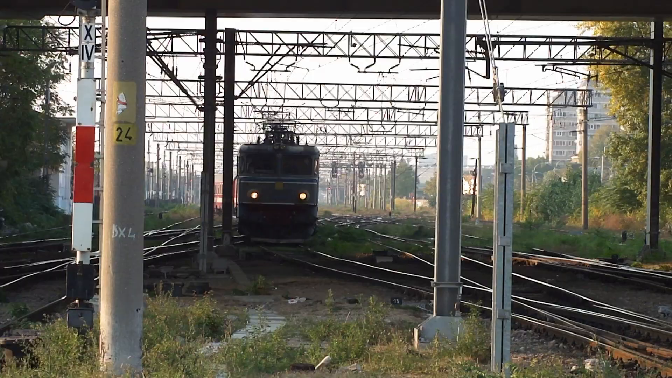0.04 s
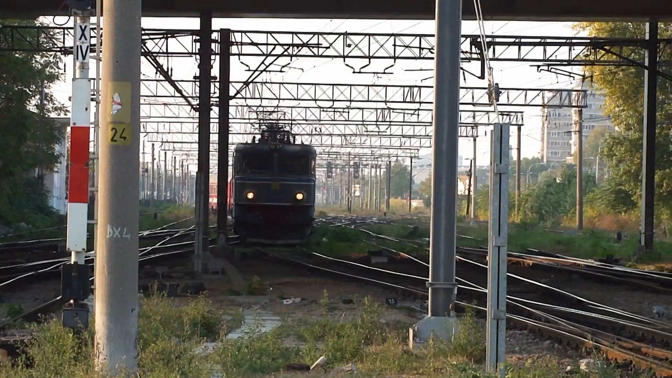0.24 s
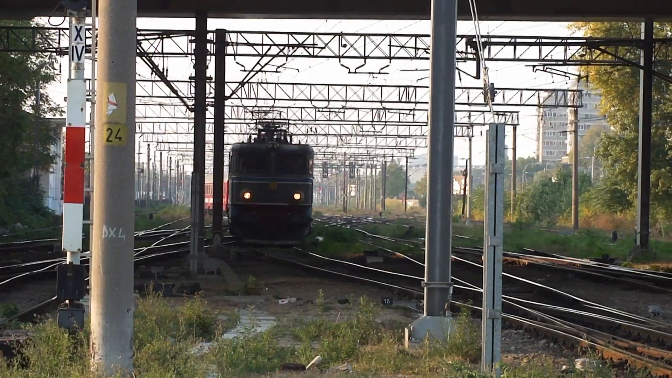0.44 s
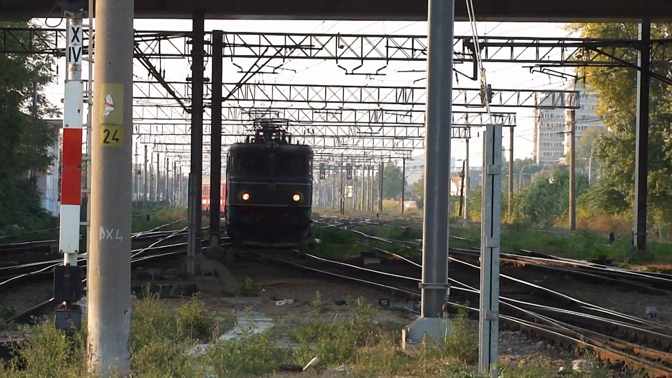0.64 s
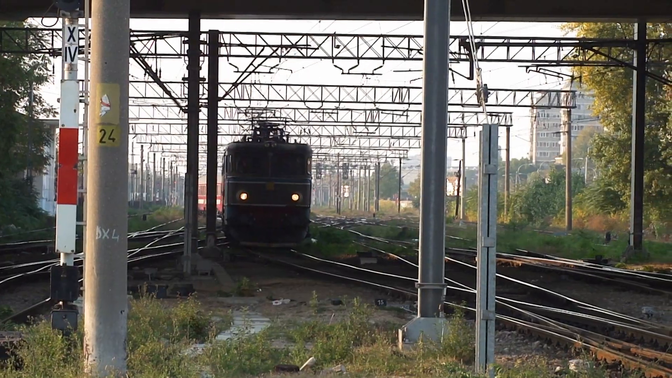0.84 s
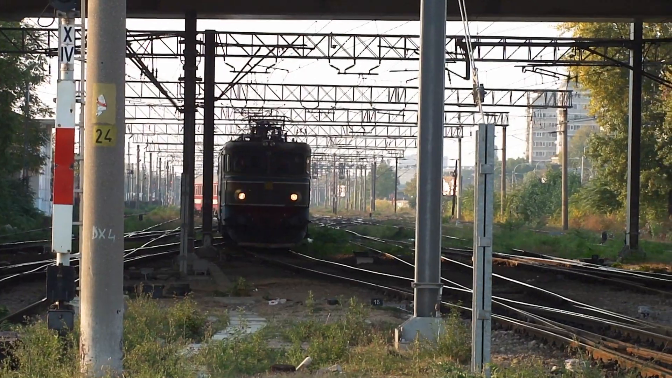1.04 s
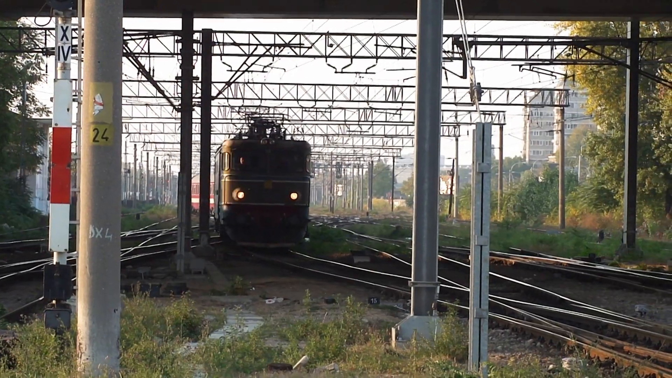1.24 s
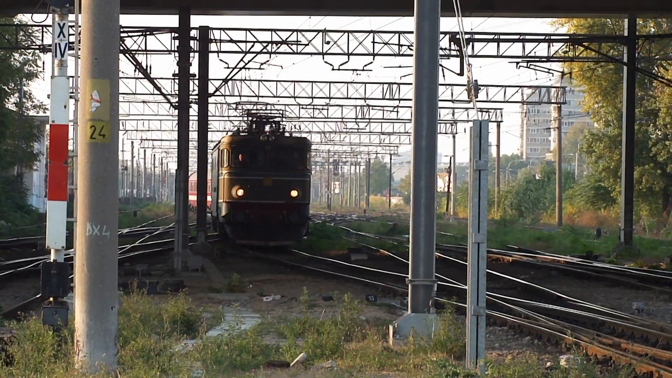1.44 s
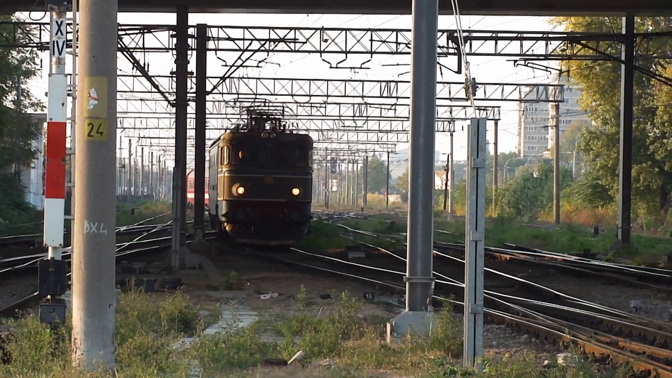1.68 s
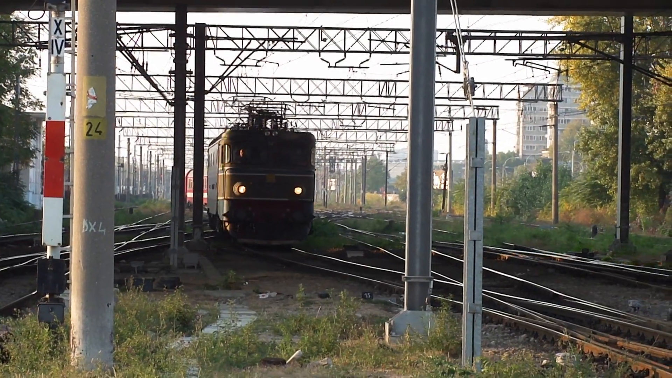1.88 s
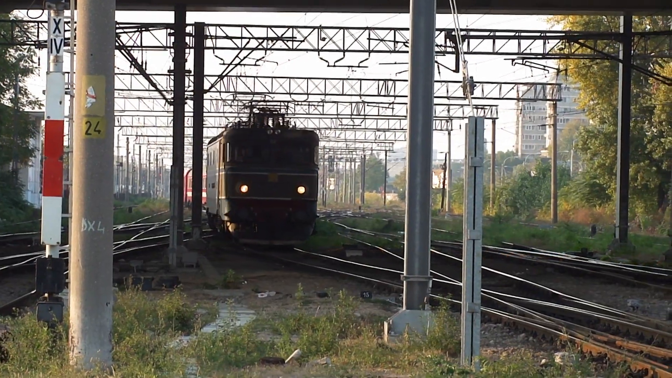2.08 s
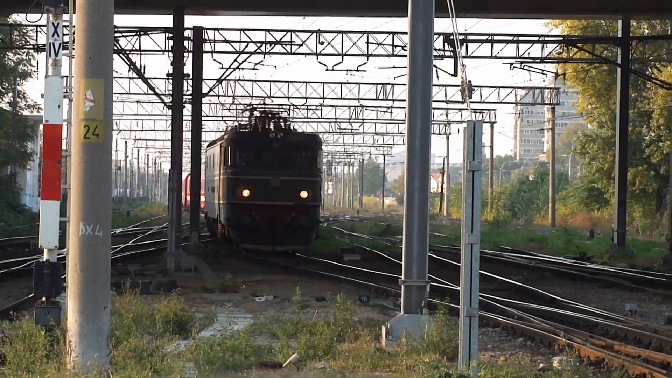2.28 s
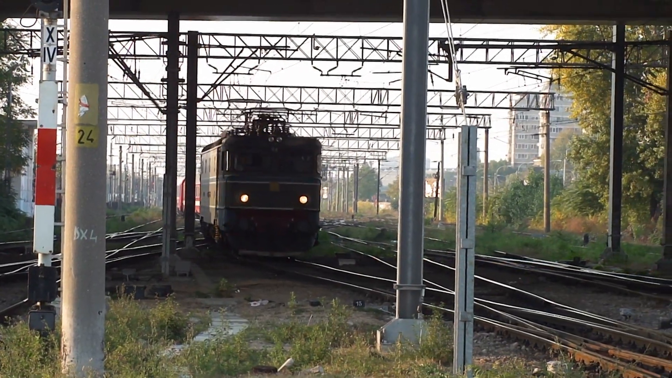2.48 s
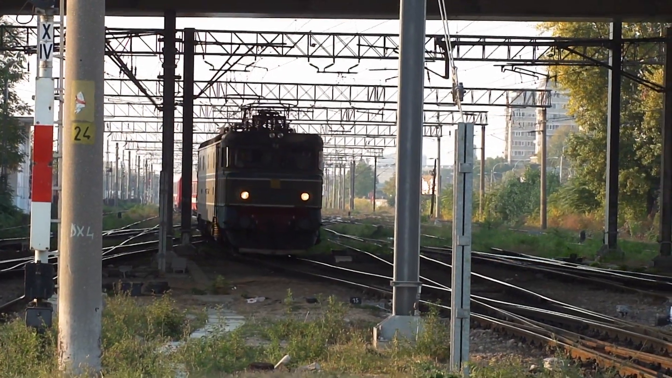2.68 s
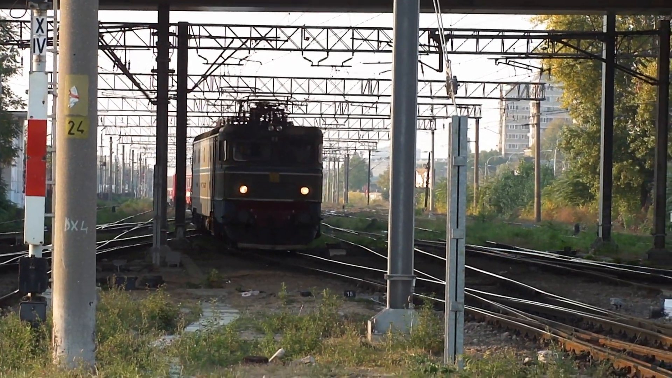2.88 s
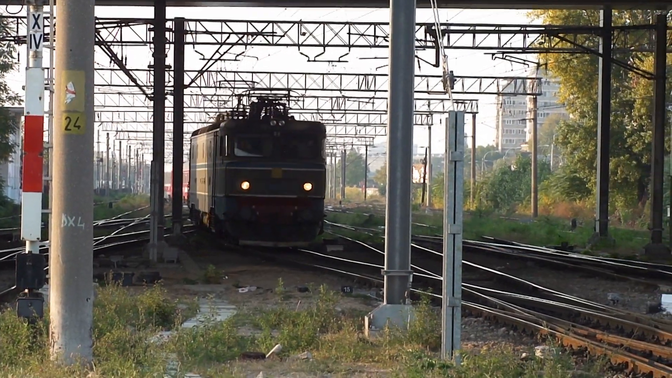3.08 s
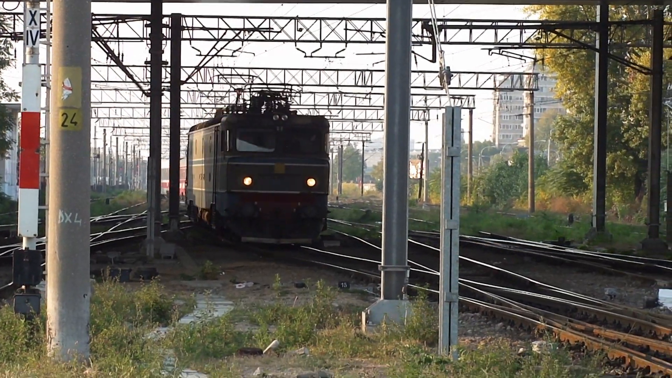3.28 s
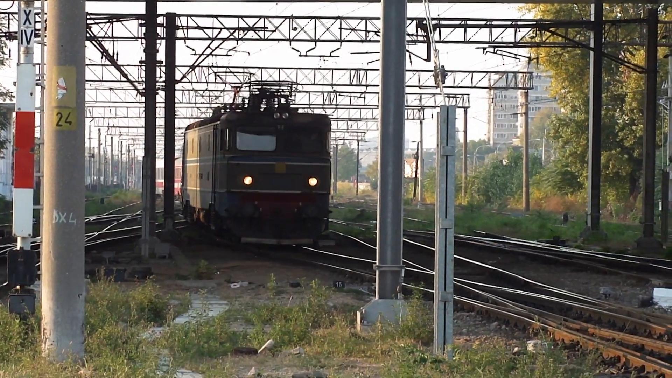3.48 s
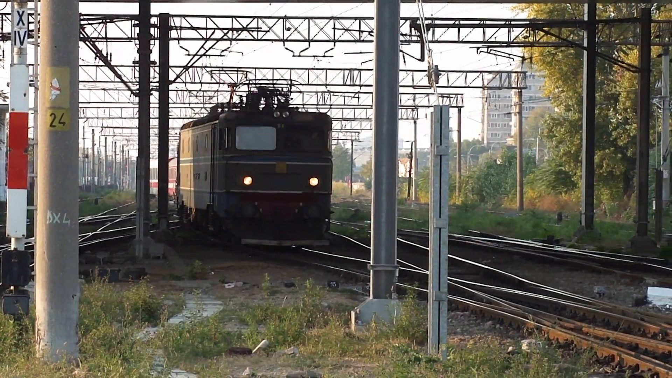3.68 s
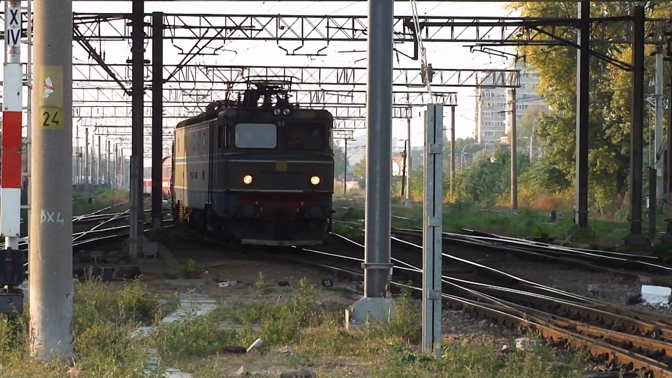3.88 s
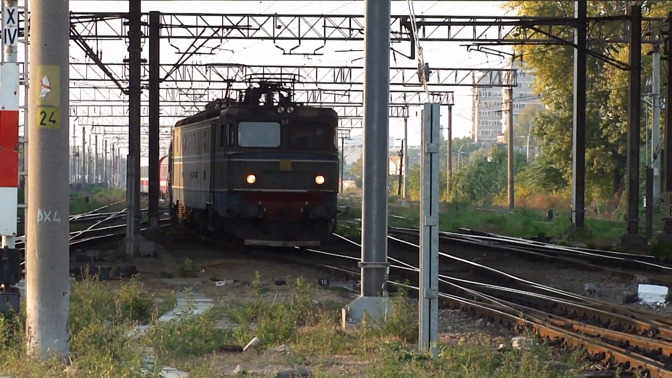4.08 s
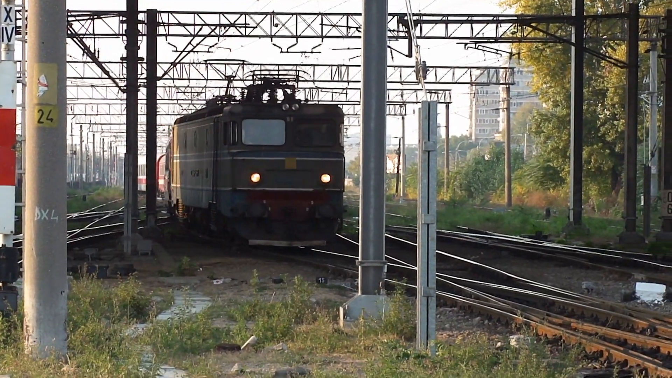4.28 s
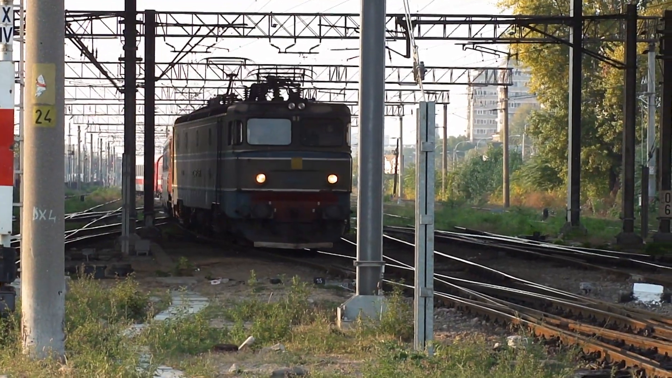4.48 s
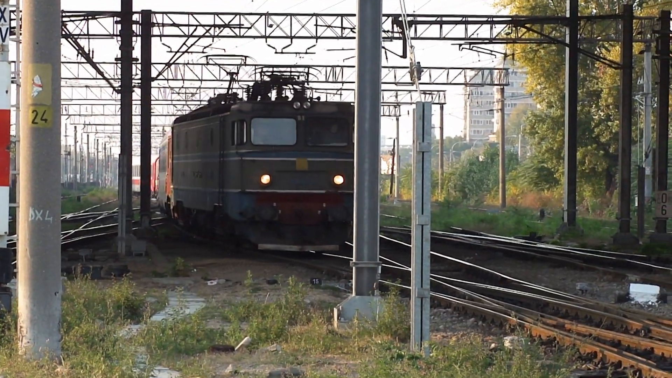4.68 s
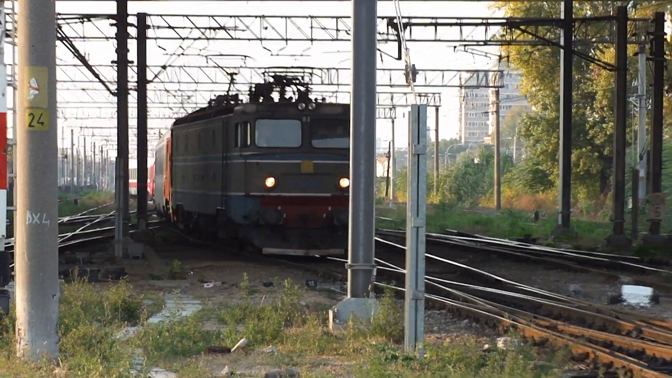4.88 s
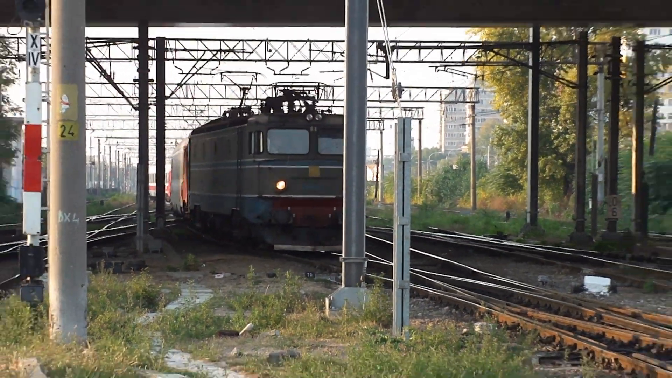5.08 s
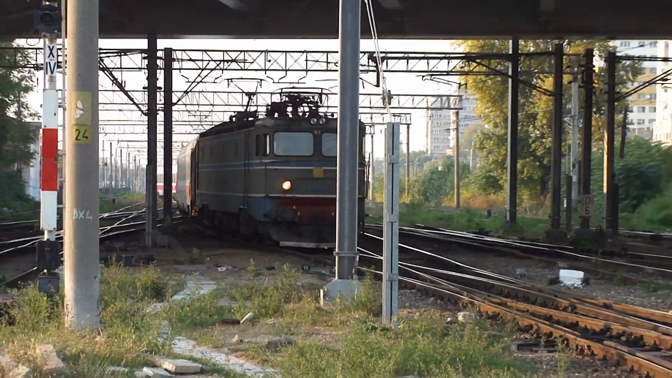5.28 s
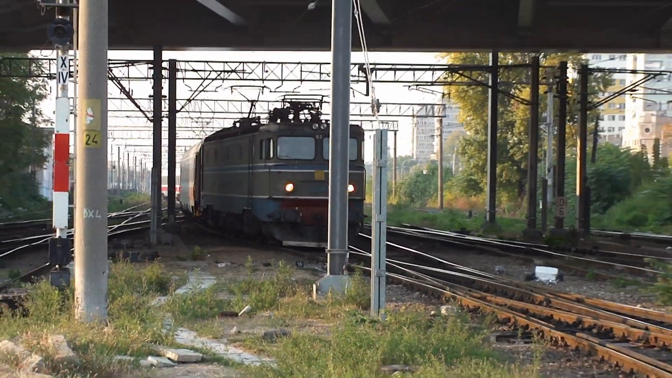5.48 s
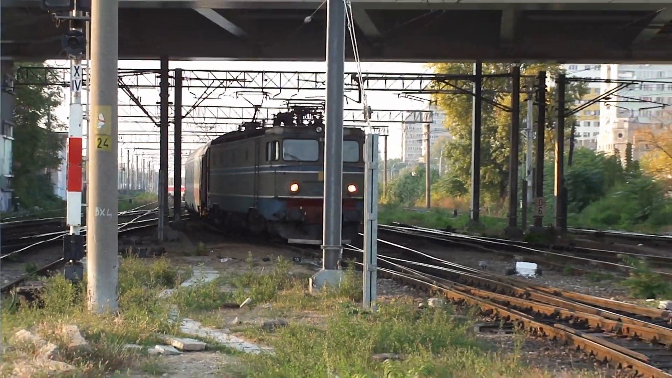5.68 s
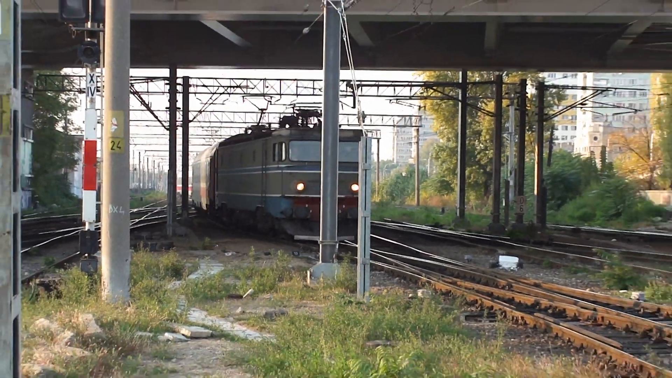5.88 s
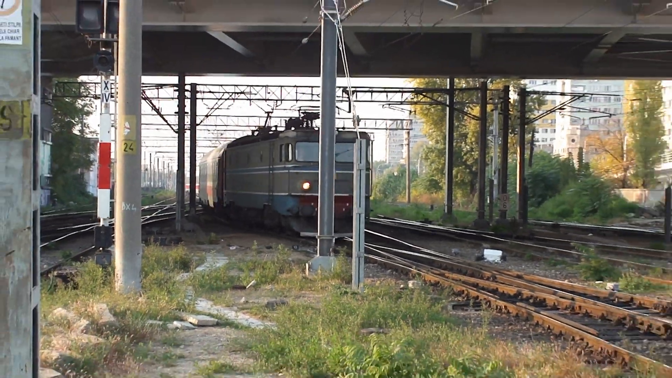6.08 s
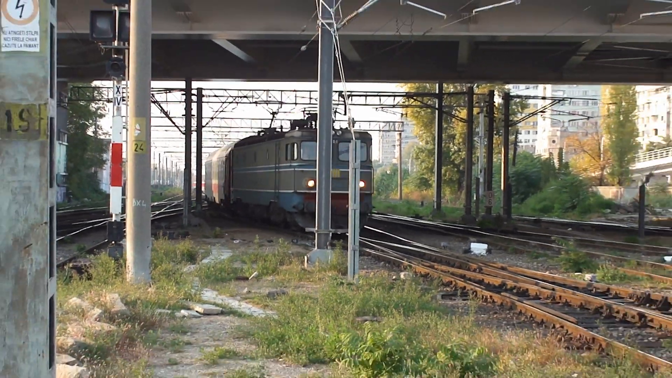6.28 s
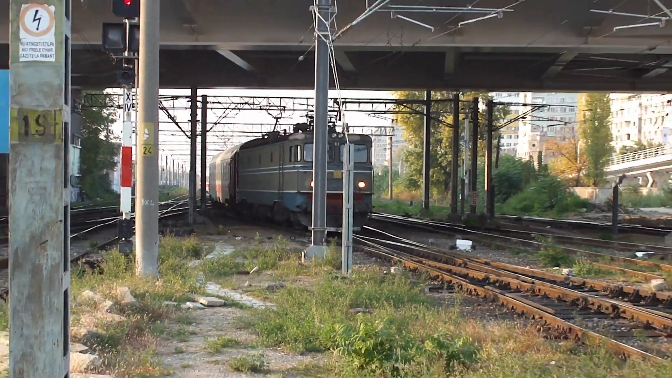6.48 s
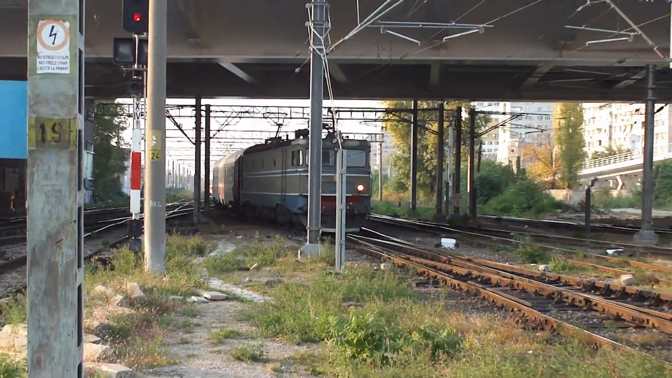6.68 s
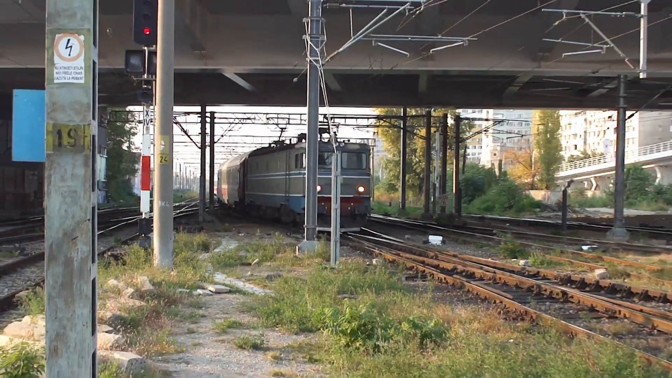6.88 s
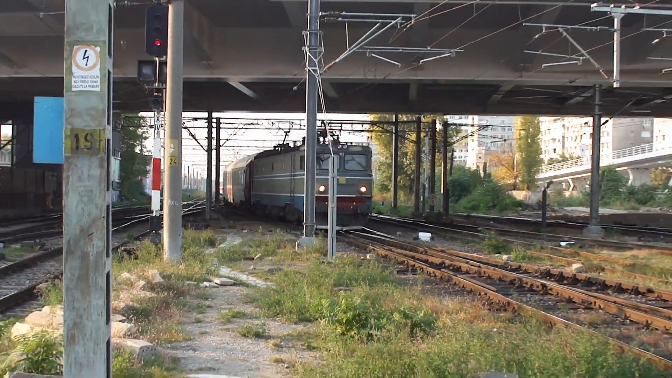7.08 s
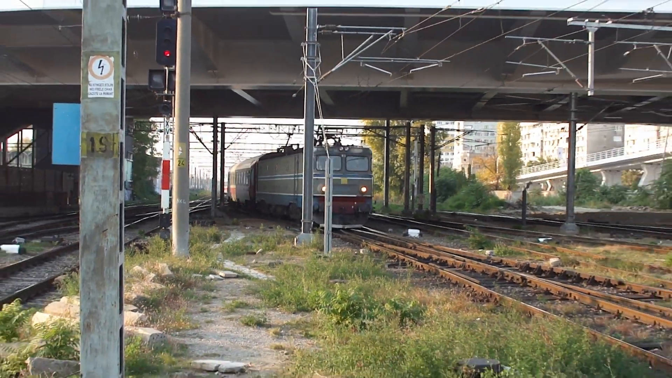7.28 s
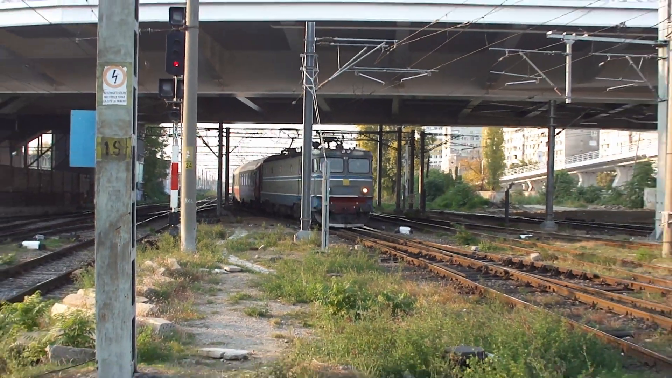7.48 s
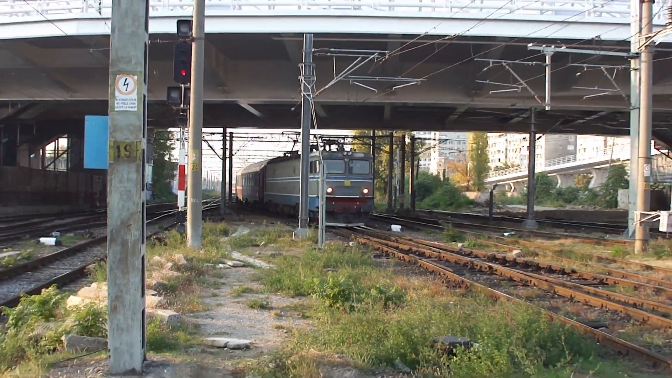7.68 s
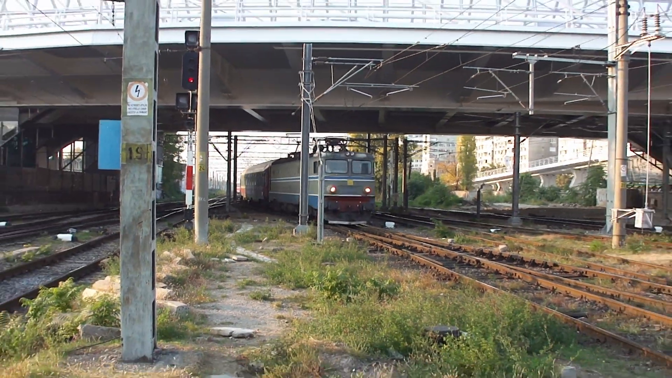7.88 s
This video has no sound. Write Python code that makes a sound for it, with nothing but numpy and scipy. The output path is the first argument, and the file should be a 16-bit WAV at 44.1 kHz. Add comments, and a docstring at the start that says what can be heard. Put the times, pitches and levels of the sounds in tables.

```python
"""A growing roar of wheels on rails: an electric locomotive hauls its coaches closer over pointwork.
Rough treads shake rails, wheels and bogies; the drive whines; the town rumbles low.
Wheels knock over joints and a flange sings thinly, both echoed by a road bridge's deck.
Faint high whistles glide; later the treads scrub through a curve.
The camcorder adds its own faint whistle and ticks, and notches the treble."""
import sys
import numpy as np
from scipy import signal
from scipy.fft import rfft, irfft, next_fast_len
from scipy.io import wavfile
from scipy.ndimage import uniform_filter1d, map_coordinates

SR = 44100
rng = np.random.default_rng(int(sys.argv[2]) if len(sys.argv) > 2 else 0)


def generate_wav(signal):
    """Clip the signal to [-1, 1] and save it as 16-bit WAV at the path in sys.argv[1]."""
    frames = np.transpose(np.atleast_2d(signal))
    scaled = np.clip(frames, -1, 1) * 32767
    pcm = np.round(scaled).astype(np.int16)
    wavfile.write(sys.argv[1], SR, pcm)


N = 349933
TIME = np.arange(N) / SR

# wheel-rail contact hiss spectrum: f/Hz, level/dB
HISS_SPECTRUM = [(2200, -39), (3400, -0.5), (4500, -6.5), (5600, 3.5), (6500, 3), (7500, -2), (9000, -8.5),
                 (11000, -35)]
# top-octave sizzle spectrum: f/Hz, level/dB
SIZZLE_SPECTRUM = [(5500, -20), (7500, 4.5), (8700, 3), (10000, -0.5), (10800, -6.5), (11200, -19)]


def amp(db):
    """Decibels to gain."""
    return 10 ** (np.asarray(db) / 20)


def unit(x):
    """x at rms 1."""
    return x / np.sqrt(np.mean(x ** 2) + 1e-20)


def along(points, hz):
    """Interpolate (f/Hz, value) points on a log axis."""
    f, v = np.transpose(points)
    return np.interp(np.log(hz + 1), np.log(f + 1), v)


def wobble(rate_hz):
    """Smooth random curve, rate_hz knots a second."""
    return map_coordinates(rng.standard_normal(int(N * rate_hz / SR) + 4), [TIME * rate_hz])


def step(start_s, rise_s):
    """Ramp from 0 to 1, then hold."""
    return np.clip((TIME - start_s) / rise_s, 0, 1)


def swell(start_s, length_s):
    """Rounded envelope, peak 1."""
    return np.sqrt(np.abs(np.sin(np.pi * step(start_s, length_s))))


def swells(rows):
    """Summed gain of swells: t/s, length/s, level/dB."""
    return sum(amp(db) * swell(t, length) for t, length, db in rows)


def blow(start_s, attack_s, t60_s):
    """Impact envelope: fast rise, exponential decay."""
    age_s = np.maximum(TIME - start_s, 0)
    return (1 - np.exp(-age_s / attack_s)) * amp(-60 * np.minimum(age_s / t60_s, 2))


def approach(db, power, start_m=87.5, speed_m_per_s=5.1):
    """Gain of db at start_m, growing as 1 / distance ** power."""
    distance_m = np.maximum(start_m - speed_m_per_s * TIME, 1)
    return amp(db) * (start_m / distance_m) ** power


def filtered(x, response):
    """Apply a frequency response to x."""
    size = next_fast_len(N + SR // 4)
    return irfft(rfft(x, size) * response(np.fft.rfftfreq(size, 1 / SR)), size)[..., :N]


def spread(pair, response):
    """Two independent noises to coloured stereo of rms 1, alike in the bass."""
    # left-right likeness: f/Hz, correlation
    likeness = [(30, .85), (60, .95), (130, .98), (270, .988), (560, .985), (1180, .96), (2490, .9),
                (3600, .65), (5240, .32), (7000, .15), (11000, .05)]

    def mid_side(hz):
        angle = np.arccos(np.clip(along(likeness, hz), -1, 1)) / 2
        return response(hz) * np.array([np.cos(angle), np.sin(angle)])

    mid, side = filtered(pair, mid_side)
    return unit(np.array([mid + side, mid - side]))


def colour(spectrum):
    """Response of a spectrum, with steep skirts beyond its ends."""
    low_hz, high_hz = spectrum[0][0], spectrum[-1][0]
    skirts = lambda hz: np.minimum(hz / low_hz, 1) ** 2 / np.maximum(hz / high_hz, 1) ** 6
    return lambda hz: amp(along(spectrum, hz)) * skirts(hz)


def rush(spectrum, patchy_db):
    """Stereo noise of rms 1 with time-frequency patches of random gain."""
    bins = signal.stft(rng.standard_normal((2, N)), nperseg=512)[2]
    patches = uniform_filter1d(rng.standard_normal(bins.shape[1:]), size=5, axis=0)
    patches = unit(uniform_filter1d(patches, size=14, axis=1))
    pair = signal.istft(bins * amp(patchy_db * patches), nperseg=512)[1][:, :N]
    return spread(pair, colour(spectrum))


def fuzzy_tone(hz, width_hz):
    """Narrow noise band of rms 1 around a pitch."""
    phase = 2 * np.pi * np.cumsum(hz * np.ones(N)) / SR
    return unit(wobble(width_hz) * np.cos(phase) + wobble(width_hz) * np.sin(phase))


def rolling():
    """Rough treads shake rails, wheels and car bodies, harder over pointwork; contact patches hiss."""
    # rail, wheel and car-body spectra: f/Hz, level/dB
    rail_spectrum = [(150, -33.5), (300, -10), (440, -2.5), (640, 0.5), (840, -1.5), (900, -10),
                     (1200, -10), (2000, -42)]
    wheel_spectrum = [(600, -36.5), (900, -3), (1100, 1), (1260, -3), (1430, -5.5), (1700, -3), (1900, -4),
                      (2100, -9.5), (2500, -17), (2800, -29), (3500, -38), (5000, -51)]
    body_spectrum = [(20, -42), (45, -29.5), (64, -35), (95, -11.5), (125, -7), (190, 1.5), (270, -1),
                     (360, -2.5), (600, -38.5)]
    # stretches of pointwork: t/s, length/s, extra rumble/dB
    pointwork = [(1.85, 1.34, 1.5), (4.22, 0.2, 2), (4.6, .25, 4.2), (5.152, .25, 1), (6.22, 1, 2)]
    wheel_load = wobble(8.3)
    shake_db = sum(db * swell(t, length) for t, length, db in pointwork)
    curve_db = 0.53 * step(4.15, rise_s=0.27)  # wheels ring louder in the curve
    bright_db = 4.5 * step(4.92, rise_s=0.015)
    rail_db = -32 + 0.15 * shake_db + 0.21 * wheel_load
    rail = approach(rail_db, power=1.81) * rush(rail_spectrum, patchy_db=0.85)
    wheel_db = -32 + curve_db + 0.5 * wheel_load
    wheel = approach(wheel_db, power=1.45) * rush(wheel_spectrum, patchy_db=0.46)
    rumble_db = -41.5 + shake_db + 0.54 * wobble(9)
    rumble = approach(rumble_db, power=1) * rush(body_spectrum, patchy_db=0.03)
    hiss_db = -56.5 + 0.21 * shake_db + 0.23 * bright_db + 0.47 * wheel_load
    hiss = approach(hiss_db, power=1.42) * rush(HISS_SPECTRUM, patchy_db=0.95)
    sizzle_db = -67.5 + bright_db + 0.5 * wobble(28)
    sizzle = approach(sizzle_db, power=1.23) * rush(SIZZLE_SPECTRUM, patchy_db=-2)
    return rail + wheel + rumble + hiss + sizzle


def bogies():
    """Roughness drives low resonances, each swelling by itself; at times one rings out."""
    # bogie and track modes: f/Hz, width/Hz, level/dB
    modes = [(366.7, 40, -6.5), (453.7, 51, -1), (546, 35, -3.5), (646.6, 90, 0.5), (762.4, 68, -2),
             (844.5, 29, -4)]
    # modes ringing out: t/s, length/s, f/Hz, level/dB
    ring_outs = [(1.298, .65, 650, -35.5), (6.1, .6, 627, -29.5), (6.68, 0.52, 750, -34),
                 (6.66, 0.7, 848, -30.5), (7.15, 0.96, 634.4, -31), (7.3, .55, 447, -32.5),
                 (7.35, 0.31, 795, -32)]
    drone = np.zeros((2, N))
    for hz, width, db in modes:
        mode = lambda f: (1j * f * width / (hz * hz - f * f + 1j * f * width)) ** 2
        drone += amp(db + 0.8 * wobble(2.48)) * spread(rng.standard_normal((2, N)), mode)
    points_db = 2 * step(5.9, rise_s=0.5)  # harder on the nearest points
    rings = sum(amp(db) * swell(t, length) * fuzzy_tone(hz, width_hz=19)
                for t, length, hz, db in ring_outs)
    return approach(-36.5 + points_db, power=1.16) * unit(drone) + rings


def drive():
    """The traction drive whines over a gear tone and a deep hum that swells once."""
    turn_db = -8 * step(6, rise_s=0.65)  # the whine dies back as the locomotive turns
    whine_db = -51.5 + turn_db + 1.3 * wobble(1.4)
    whine = approach(whine_db, power=2.3) * fuzzy_tone(hz=1940, width_hz=30)
    gear = approach(-45.5 + 1.5 * wobble(2.1), power=1.2) * fuzzy_tone(hz=844, width_hz=29)
    hum = amp(-62.5 + 5.5 * swell(0.94, length_s=1.7)) * fuzzy_tone(hz=75.4, width_hz=37)
    return whine + gear + hum


def town():
    """Steady low rumble of the town around the tracks."""
    spectrum = [(20, -7.5), (45, -10.5), (80, 0.5), (200, -4), (1000, -15)]  # f/Hz, level/dB
    return amp(-61.5) * rush(spectrum, patchy_db=-0.5)


def camcorder(field_hz=50):
    """The electronics whistle on two close tones; the mechanism ticks once a picture field."""
    tone = lambda hz: np.sqrt(2) * np.sin(2 * np.pi * hz * TIME + 0.5 * wobble(8))
    whistle = amp(-72.5) * (tone(hz=7800) + tone(hz=7825))
    field_phase = TIME * field_hz % 1
    ticks = amp(-64) * unit(np.exp(-field_phase / 0.13) * rush(HISS_SPECTRUM, patchy_db=-3))
    return whistle + ticks


def joints():
    """A wheel drops into a gap: dull thud, sharp crack, longer bright clink."""
    # wheels on joints and frogs: t/s, clink/dB, thud/dB, crack/dB
    hits = [(.583, -56, -37, -54.5), (.94, -54.5, -45, -64), (1.065, -61, -27.5, -67),
            (1.924, -51, -27, -66), (2.108, -53, -39, -54), (2.18, -58, -26.5, -62), (2.39, -61, -32, -68),
            (3.25, -58.5, -28, -68), (4.27, -60, -23.5, -68), (4.283, -50, -33.5, -53),
            (4.335, -58, -24, -66), (4.928, -49, -44, -45), (5.138, -51, -36, -57), (5.21, -60, -26, -68),
            (5.973, -46, -37, -53), (6.257, -43, -21, -40), (6.615, -45, -35, -49), (6.79, -59, -30, -61),
            (6.948, -49, -35, -47), (7.498, -55, -36, -50), (7.79, -56, -35, -50)]
    # impact spectra: f/Hz, level/dB
    clink_spectrum = [(2000, -22), (3500, -1.5), (5000, -6.5), (6800, 6.5), (8800, -3), (11000, -16)]
    thud_spectrum = [(50, -31), (130, -14), (200, 4), (400, 5), (650, 5.5), (1200, -0.5), (2200, -15),
                     (3200, -33)]
    crack_spectrum = [(3000, -17), (5200, -7), (6700, 1), (8300, 1), (9500, -6), (11000, -13)]
    clink = sum(amp(db) * blow(t, attack_s=0.002, t60_s=0.38) for t, db, _, _ in hits)
    thud = sum(amp(db) * blow(t, attack_s=0.0034, t60_s=0.26) for t, _, db, _ in hits)
    crack = sum(amp(db) * blow(t, attack_s=0.0006, t60_s=0.056) for t, _, _, db in hits)
    noise = lambda spectrum: spread(rng.standard_normal((2, N)), colour(spectrum))
    return clink * noise(clink_spectrum) + thud * noise(thud_spectrum) + crack * noise(crack_spectrum)


def bridge(x):
    """The concrete deck answers 20 ms late; its treble dies first."""
    # reverberation under the deck: f/Hz, t60/s
    decay = [(200, 0.58), (2000, .5), (9000, 0.29)]
    hz, t, bins = signal.stft(rng.standard_normal((2, SR // 2)), SR, nperseg=256)
    tail = signal.istft(bins * amp(-60 * t / along(decay, hz)[:, None]), SR, nperseg=256)[1]
    late = np.pad(x, ((0, 0), (SR // 50, 0)))
    return signal.fftconvolve(late, tail / np.linalg.norm(tail[0]), axes=1)[:, :N]


def whistles():
    """Faint, broken high whistles rise and sag over thin scraping and two short chirps."""
    # high scrapes: t/s, length/s, level/dB
    scrapes = [(.92, 0.81, -61), (1.8, 0.27, -65), (2.55, .25, -66), (3.2, 1.2, -65), (4.47, .22, -60.5)]
    # gliding whistles: t/s, length/s, start f/Hz, top f/Hz, end level/dB
    glides = [(1.0, .66, 8400, 9800, -67), (1.76, .24, 8100, 8900, -71), (3.25, .42, 8900, 9350, -70)]
    # high chirps: t/s, length/s, f/Hz, level/dB
    chirps = [(2.18, 0.024, 8230, -53), (3.902, .012, 10100, -60.5)]
    out = swells(scrapes) * rush(SIZZLE_SPECTRUM, patchy_db=-1)
    for t, length, start_hz, top_hz, end_db in glides:
        progress = step(t, length)
        arch = np.interp(progress, [0, 0.57, 1], [0, 1, 0.55])
        hz = start_hz + (top_hz - start_hz) * arch + 35 * wobble(30)
        level_db = end_db + 6 * (1 - progress) + 2.2 * wobble(32)
        out += amp(level_db) * swell(t, length) * fuzzy_tone(hz, width_hz=330)
    for t, length, hz, db in chirps:
        out += amp(db) * swell(t, length) * fuzzy_tone(hz, width_hz=1700)
    return out


def flange():
    """A flange rubs the rail; a high wheel mode sings in short bursts."""
    # squeals: t/s, length/s, f/Hz, level/dB
    squeals = [(1.5, .05, 6020, -56), (6.29, .14, 6670, -50.5), (6.61, 0.16, 6680, -49.5),
               (6.96, 0.18, 6700, -53)]
    stereo_tone = lambda hz: np.array([fuzzy_tone(hz, width_hz=180) for ear in range(2)])
    return sum(amp(db) * swell(t, length) * stereo_tone(hz) for t, length, hz, db in squeals)


def scrub():
    """Treads slip sideways in the curve and excite one broad wheel resonance."""
    # tread slips: t/s, length/s, level/dB
    slips = [(4.25, 1.25, -34.5), (4.8, 1.6, -37), (6.75, .4, -30.5), (7.4, .4, -34)]
    resonance = [(850, -13), (1020, -4), (1130, -4.5), (1220, -1), (1380, -22.5)]  # f/Hz, level/dB
    return swells(slips) * rush(resonance, patchy_db=0.5)


def scene():
    """Train, town and thin high tones; only knocks and squeals echo off the bridge."""
    contacts = joints() + flange()
    train = rolling() + bogies() + scrub() + drive() + contacts + amp(-19.5) * bridge(contacts)
    return train + town() + whistles() + camcorder()


def record(dry, lag_samples=0.79, top_hz=11300):
    """Left side louder and slightly late; the camcorder cuts three notches; no treble above top_hz."""
    # channel balance: f/Hz, left minus right/dB
    balance = [(60, 1.5), (110, 1.5), (190, 1.4), (340, 1.9), (610, 0.96), (1090, 2.4), (1940, 1.1),
               (3460, 0.5), (6180, 4.7), (11000, 6.1)]
    # camcorder notches: f/Hz, width/Hz, depth/dB
    notches = [(3023, 117, 15), (4016, 172, 17.5), (5030, 200, 19.5)]
    side = np.array([[0.5], [-0.5]])

    def response(f):
        lean = amp(side * along(balance, f))
        lag = np.exp(-2j * np.pi * f * side * lag_samples / SR)
        cut_db = sum(db * np.exp(-((f - hz) / width) ** 2) for hz, width, db in notches)
        return lean * lag * amp(-cut_db) * (f < top_hz)

    return filtered(dry, response)


dry = scene()
out = record(dry)
generate_wav(out)
```